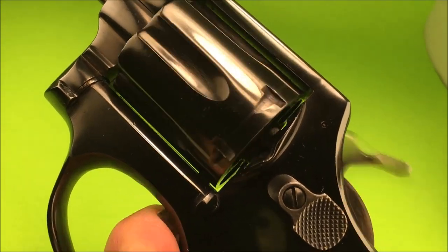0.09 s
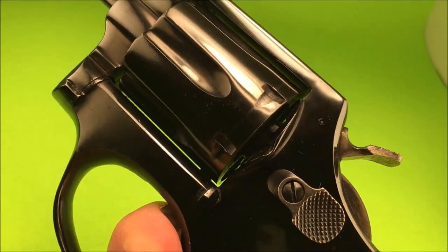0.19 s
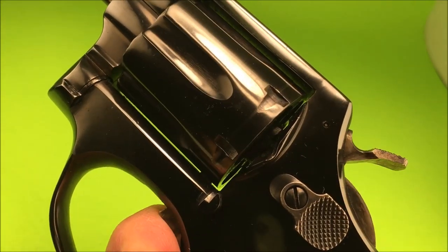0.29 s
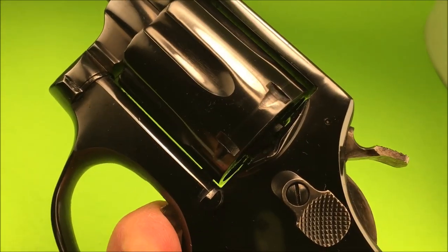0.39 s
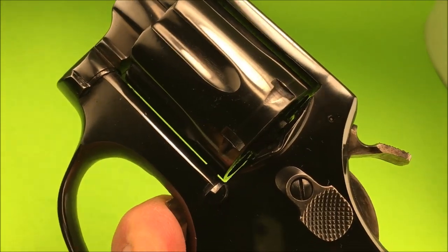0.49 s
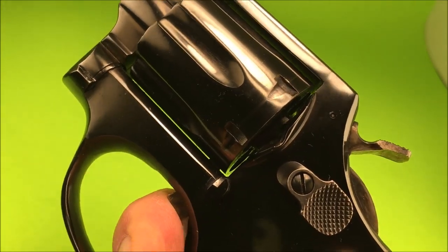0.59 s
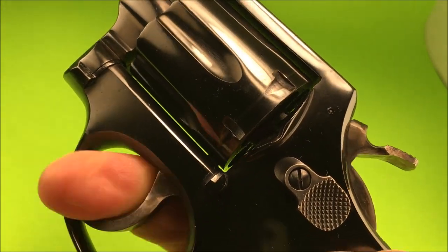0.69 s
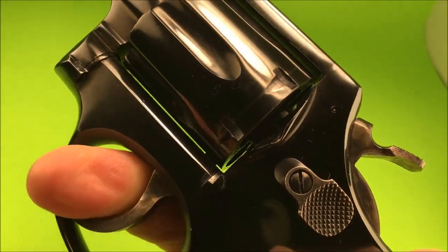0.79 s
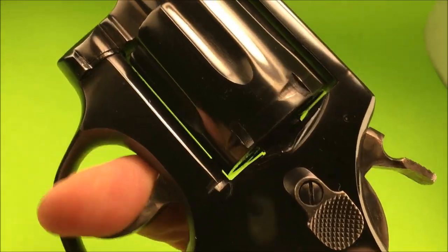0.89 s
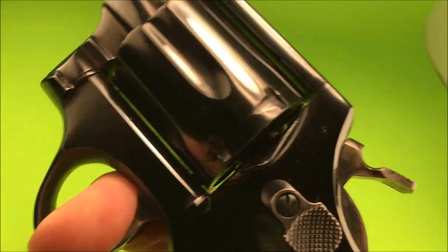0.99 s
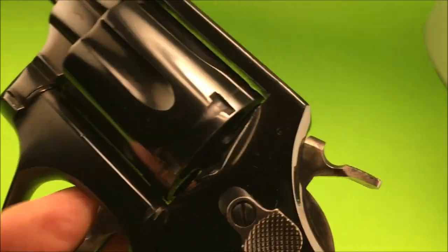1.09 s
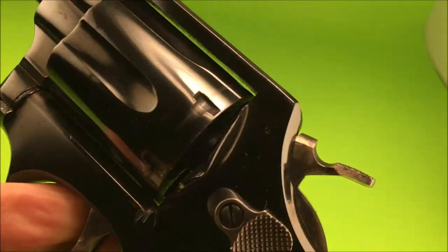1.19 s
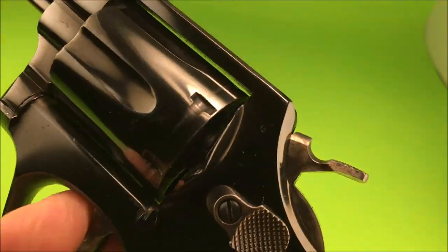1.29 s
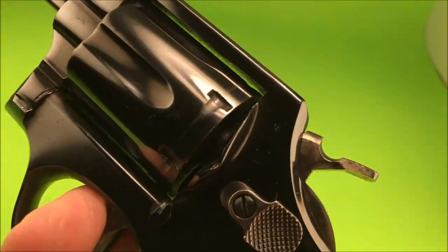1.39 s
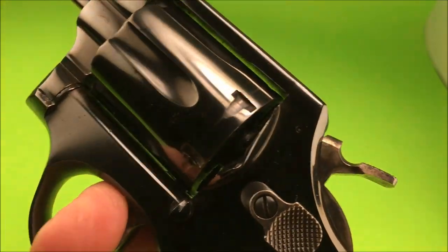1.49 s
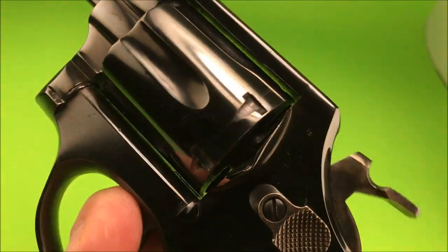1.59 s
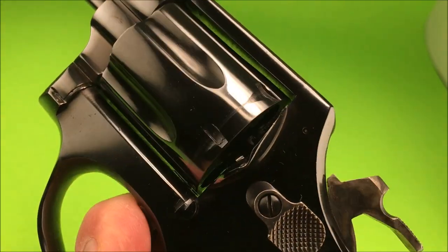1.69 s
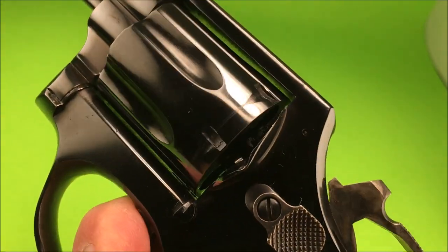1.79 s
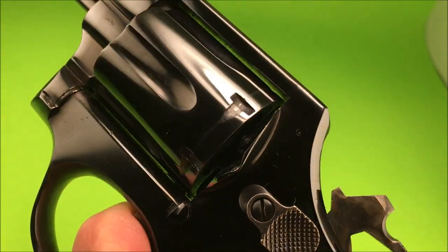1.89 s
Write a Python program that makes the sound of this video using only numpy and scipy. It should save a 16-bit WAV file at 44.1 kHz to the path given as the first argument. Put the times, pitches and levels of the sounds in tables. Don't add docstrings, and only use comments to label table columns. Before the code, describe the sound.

A revolver's hammer drops with a hard steel clack, then its trigger snaps back sharply

```python
import sys
import numpy as np
from scipy import signal
from scipy.fft import rfft, irfft
from scipy.io import wavfile
from scipy.ndimage import uniform_filter1d

SR = 44100
rng = np.random.default_rng(int(sys.argv[2]) if len(sys.argv) > 2 else 0)


def persist_wave(psi):
    counts = np.round(np.clip(psi, -1, 1) * 32767).astype(np.int16)
    wavfile.write(sys.argv[1], SR, np.atleast_2d(counts).T)


def voltage_ratio(level):
    return 10 ** (np.asarray(level, float) / 20)


N = 85995

# pitch_hz, level_db (per Hz)
AIR_SPECTRUM = [(24, -31), (40, -1.5), (237, -9.5), (422, -16.5), (479, -24), (585, -26.5), (1180, -29),
                (1590, -34.5), (16000, -51.5)]
# time_s, gain_db
GAIN_DUCKING = [(0, 2), (0.201, 3.5), (.27, -6.5), (0.424, -16.5), (.435, -7.5), (.68, -4), (0.899, 1.5),
                (1.2, 3), (1.95, 1.5)]
# start_s, peak_db, ring_hz, t60_s, crack_db
HAMMER_FALL = [(.0423, -46, 2600, .015, -10), (.1930, -46, 4000, .01, -6), (.1962, -22, 3000, .03, 3),
               (.2044, -17, 5000, .03, 2), (.2067, -10, 4000, .016, -2), (.2158, -13, 3700, .02, 0),
               (.2166, -5, 3700, .022, -4), (.2213, -6, 2500, .02, 0), (.2238, -8, 6900, .025, 0),
               (.2272, -8, 3400, .025, -2), (.2298, -13, 6900, .05, 2), (.2333, -13, 6900, .06, 2)]
# start_s, peak_db, ring_hz, t60_s, crack_db
TRIGGER_RESET = [
    (.6913, -50, 3000, .01, -3),
    (.7262, -53, 2300, .012, -3),
    (.7484, -21, 6700, .011, -9),
    (.7532, -28, 3600, .022, -4),
    (.7738, -24, 9800, .012, -4),
    (.7914, -6, 7000, .022, -5),
    (.7981, -2.5, 9400, .018, -5),
    (.8000, -5, 6000, .03, -3),
]
# start_s, peak_db, ring_hz, t60_s, crack_db
SPRING_TICKS = [(.9655, -48, 2900, .02, -16), (.9778, -36, 3000, .016, -14), (.9876, -34, 3250, .005, -13),
                (.9962, -46, 2500, .02, -10), (1.0130, -45, 2100, .02, -10), (1.0305, -51, 8000, .01, -6),
                (1.0362, -37, 5300, .026, -18), (1.1835, -50, 4000, .015, -5),
                (1.1908, -37, 6500, .018, -3), (1.1955, -37, 2100, .02, -14), (1.2078, -43, 2000, .015, -6),
                (1.2126, -28, 2900, .032, -14), (1.2512, -42, 9000, .018, 0), (1.4726, -55, 2500, .01, -8)]
# start_s, peak_db, ring_hz, t60_s, crack_db
COCKING = [(1.5800, -59, 3730, 0.0086, -15), (1.6005, -56, 3730, .01, -12),
           (1.6155, -55.5, 3500, 0.0072, -12), (1.6305, -52, 3603, 0.0078, 5),
           (1.6550, -50, 2072, 0.013, -1), (1.705, -27, 4200, 0.016, -22), (1.7088, -28, 6400, 0.02, -18),
           (1.7172, -50.5, 8500, 0.0078, -10), (1.7415, -41.5, 9400, 0.01, 7),
           (1.7540, -39.5, 9330, .012, -14), (1.7730, -41.5, 9800, 0.013, -12)]
# pitch_hz, level_db, width_hz
STEEL_MODES = [(1050, -12, 150), (1620, -4, 110), (2080, -1, 170), (2720, -2, 150), (3200, -5, 200),
               (3760, 0, 200), (5300, -2, 400), (6400, -4, 450), (6950, -2, 450), (8200, -2, 500),
               (9350, 0, 550), (10900, -2, 650), (12400, -3, 700), (14200, -5, 900)]
# start_s, length_s, level_db, centre_hz
RUBS = [
    (0.199, 0.026, -31, 3000),
    (0.733, 0.12, -52.5, 2500),
    (0.876, 0.36, -74, 4630),
    (0.949, 0.14, -59, 3300),
    (1.167, 0.069, -62, 3000),
    (1.687, 0.042, -53.5, 4170),
    (1.73, 0.054, -54, 3320),
    (.82, .3, -71, 12000),
    (1.023, 0.21, -66.5, 3870),
]
# strongest_s, pitch_hz, peak_db, swell_s, fade_s
THUMPS = [(.2288, 55, -3.6, .003, .013), (.2288, 178, -8.5, .007, .002), (.2212, 640, -9, .0008, .0014),
          (.210, 400, -25, .004, .005), (.2215, 1100, -16, .001, .0015), (.223, 400, -18, .002, .003),
          (.69, 70, -48, .01, .02), (.7915, 400, -26, .0003, .0015), (.7985, 750, -20, .0003, .001),
          (.799, 280, -28, .001, .002), (.799, 140, -32, .002, .004), (.80, 55, -40, .004, .012),
          (1.252, 130, -46, .002, .006)]
# start_s, level_db
FRAME_BLOWS = [
    (0.226, -31.5),
    (0.802, -50),
]
# centre_hz, width_hz, level_db, t60_s
FRAME_MODES = [(2240, 160, -11, .5), (3550, 600, -5, .4), (6900, 500, -6, .45), (8500, 450, -11, .5),
               (6000, 8000, -1, .3), (12500, 7000, 2, .28), (700, 600, -12, .12), (3000, 6000, -19, 1.6)]

AIR_DB, FLICKER_DB = -58, 9.5
BASS_DUCK, TREBLE_DUCK, TAIL_DUCK = 1.7, .5, 0.99
STEEL_SCATTER_DB, COLOUR_DB_PER_OCTAVE = 2, 9
STRIKE, CHATTER_SHARE = 3, .55
CRACK_HZ, CRACK_WIDTH_HZ = 9000, 14000
EARLY_DB, EARLY_T60_S, LATE_DB, LATE_T60_S = -25.5, 0.15, -49.5, 1.9
ROOM_TREBLE_LOSS = 0.16
TOP_HZ = 15900


def band(x, hz, width_hz):
    return signal.lfilter(*signal.iirpeak(min(hz, .44 * SR), max(hz / width_hz, .3), fs=SR), x)


def wide_band(x, hz, width_hz):
    return band(band(x, hz, width_hz), hz, width_hz)


def unit(x):
    return x / np.abs(x).max()


def add(out, start_s, x):
    i = int(start_s * SR)
    out[i:i + len(x)] += x[:N - i]


def walk(rate_hz):
    hold = int(SR / rate_hz)
    levels = np.repeat(rng.standard_normal(N // hold + 1), hold)
    return 0.4 * uniform_filter1d(levels, hold)[:N]


def ducking_db():
    return np.interp(np.arange(N) / SR, *np.array(GAIN_DUCKING).T)


def air():
    out = 0
    f = np.arange(N // 2 + 1) * SR / N + 1
    table = np.array(AIR_SPECTRUM)
    shape = voltage_ratio(np.interp(np.log(f), np.log(table[:, 0]), table[:, 1]))
    shape = shape / np.sqrt(np.mean(shape ** 2))
    duck_db = ducking_db()
    for hz in 25 * 2 ** np.arange(0, 10, .5):
        window = np.cos(np.pi * np.clip(np.log2(f / hz), -.5, .5))
        share = BASS_DUCK if hz < 130 else 1 if hz < 450 else TREBLE_DUCK
        level_db = AIR_DB + FLICKER_DB * walk(8) + duck_db * share
        noise = irfft(rfft(rng.standard_normal(N)) * shape * window, N)
        out = out + noise * voltage_ratio(level_db)
    return out


def clicks():
    out = np.zeros(N)
    t = np.arange(SR // 10) / SR
    for start_s, peak_db, ring_hz, t60_s, crack_db in HAMMER_FALL + TRIGGER_RESET + SPRING_TICKS + COCKING:
        chatter_noise, crack_noise = rng.standard_normal((2, len(t)))
        scatter = rng.standard_normal(len(STEEL_MODES))
        env = np.exp(-np.log(1000) * t / t60_s) * (1 - np.exp(-t / .0001))
        first_contact = STRIKE * (t < .00012)
        chatter = (chatter_noise + first_contact) * env ** (1 / CHATTER_SHARE)
        ring = np.zeros(len(t))
        for (hz, db, width_hz), chance in zip(STEEL_MODES, scatter):
            colour_db = COLOUR_DB_PER_OCTAVE * abs(np.log2(hz / ring_hz))
            mode_db = db + STEEL_SCATTER_DB * chance - colour_db
            ring += voltage_ratio(mode_db) * unit(band(chatter, hz, width_hz))
        crack = wide_band(crack_noise * env, CRACK_HZ, CRACK_WIDTH_HZ)
        add(out, start_s, voltage_ratio(peak_db) * unit(unit(ring) + voltage_ratio(crack_db) * unit(crack)))
    return out


def room(x):
    t = np.arange(SR) / SR
    early, late = rng.standard_normal((2, SR)) / np.sqrt(SR / 100)
    late = signal.lfilter([1 - ROOM_TREBLE_LOSS], [1, -ROOM_TREBLE_LOSS], late)
    tail = voltage_ratio(EARLY_DB - 60 * t / EARLY_T60_S) * early
    tail += voltage_ratio(LATE_DB - 60 * t / LATE_T60_S) * late
    return signal.fftconvolve(x, tail * np.clip(t / 0.012, 0, 1))[:N]


def rubs():
    out = np.zeros(N)
    for start_s, length_s, level_db, centre_hz in RUBS:
        u = np.arange(N // 4) / SR / length_s
        grains = rng.standard_normal(len(u))
        uneven_db = 3 * uniform_filter1d(rng.standard_normal(len(u)), size=60) * np.sqrt(60)
        grit = wide_band(grains * voltage_ratio(uneven_db), centre_hz, 1.5 * centre_hz)
        swell = np.sin(np.pi * np.clip(u, 0, 1)) ** 0.47
        add(out, start_s, voltage_ratio(level_db) * grit / grit.std() * swell)
    return out


def thumps():
    out, t = np.zeros(N), np.arange(N) / SR
    for strongest_s, hz, peak_db, swell_s, fade_s in THUMPS:
        after = t - strongest_s
        env = np.exp(-(after / np.where(after < 0, swell_s, fade_s)) ** 2 / 2)
        out += voltage_ratio(peak_db) * env * np.sin(2 * np.pi * hz * after)
    return out


def shimmer():
    out, t = np.zeros(N), np.arange(SR) / SR
    for start_s, blow_db in FRAME_BLOWS:
        for hz, width_hz, mode_db, t60_s in FRAME_MODES:
            crowd = band(band(rng.standard_normal(len(t)), hz, width_hz), hz, 2 * width_hz)
            decay = voltage_ratio(blow_db + mode_db - 60 * t / t60_s)
            add(out, start_s, decay * crowd / crowd.std() * np.clip(t / 0.001, 0, 1))
    return out


def scene():
    gun = clicks() + rubs()
    tails = room(gun) + shimmer()
    return (gun + voltage_ratio(TAIL_DUCK * ducking_db()) * tails + thumps() + air())[None]


def roll_off(x):
    return signal.sosfilt(signal.butter(12, 16970, fs=SR, output="sos"), x)


def record(dry):
    rounded = dry - dry ** 3 / 8
    low_pass = signal.ellip(8, .2, 40, TOP_HZ, fs=SR, output="sos")
    mix = signal.sosfilt(low_pass, rounded)
    return roll_off(mix)


dry = scene()
out = record(dry)
persist_wave(out)
```